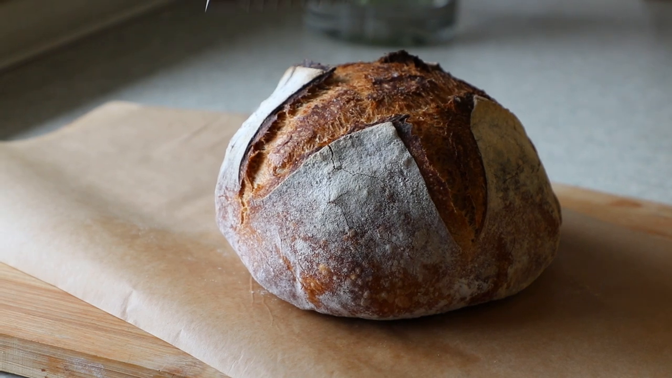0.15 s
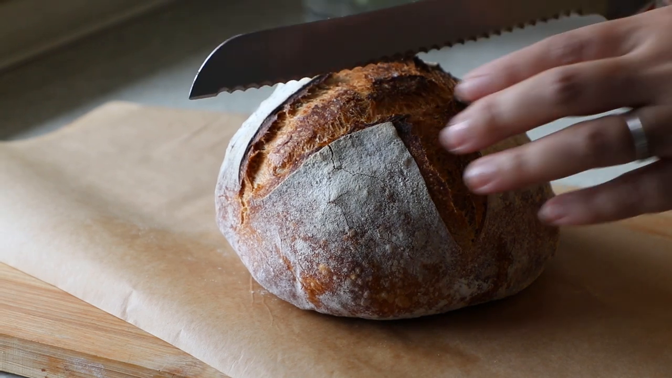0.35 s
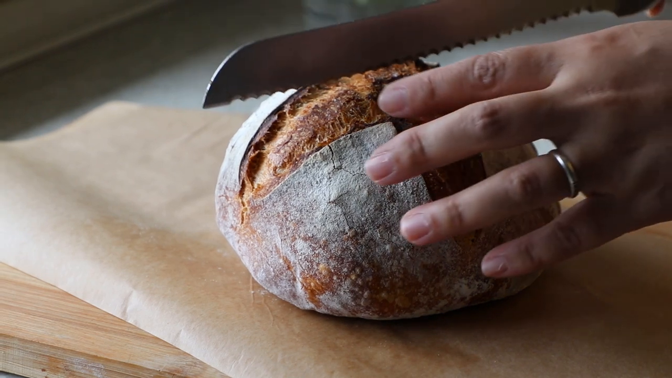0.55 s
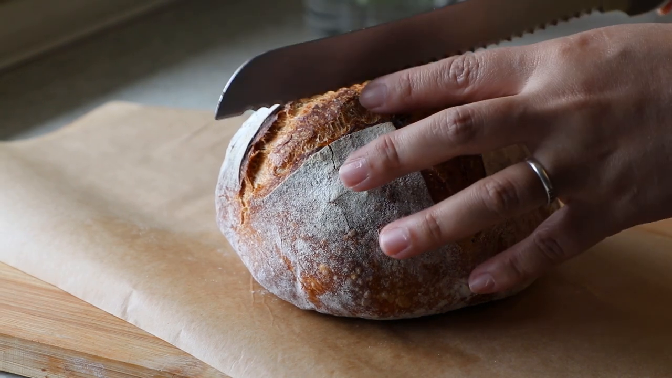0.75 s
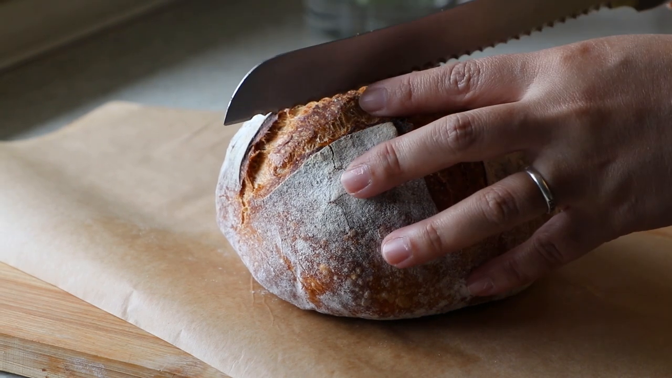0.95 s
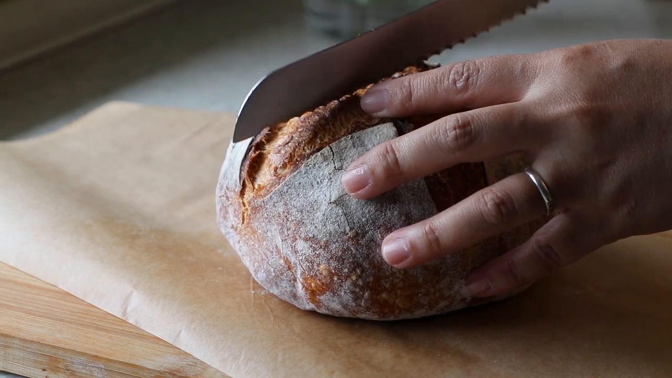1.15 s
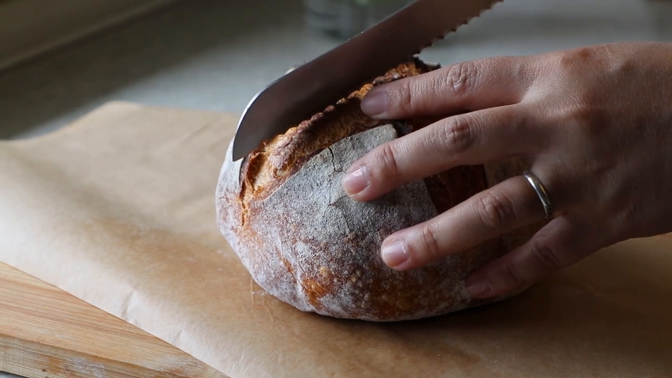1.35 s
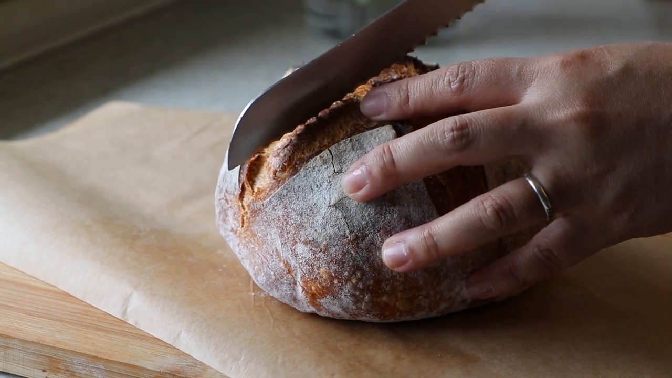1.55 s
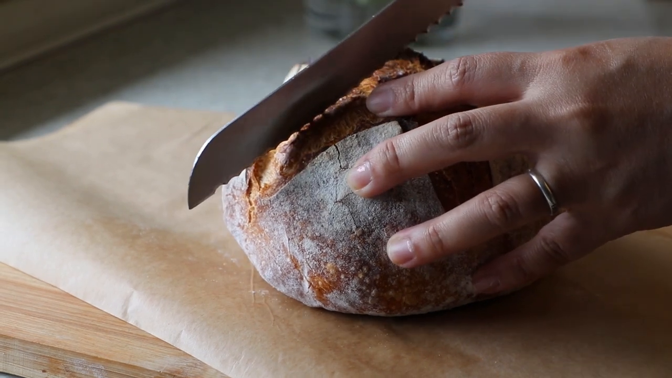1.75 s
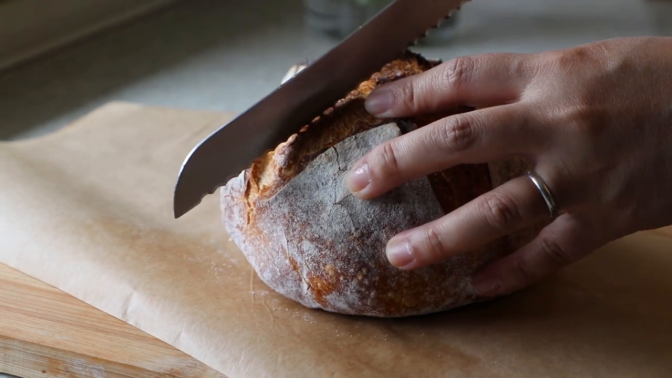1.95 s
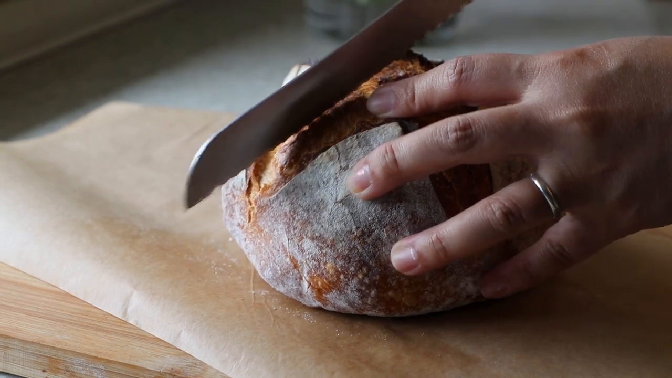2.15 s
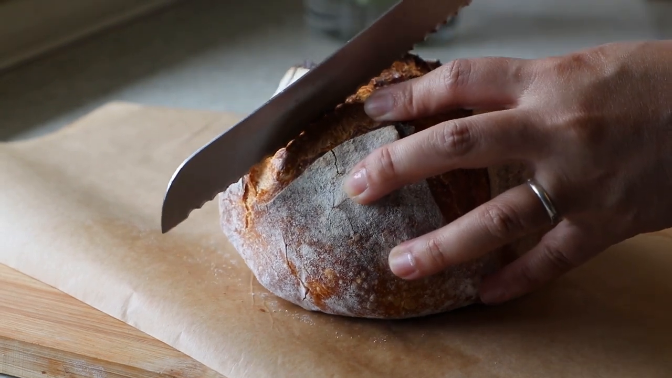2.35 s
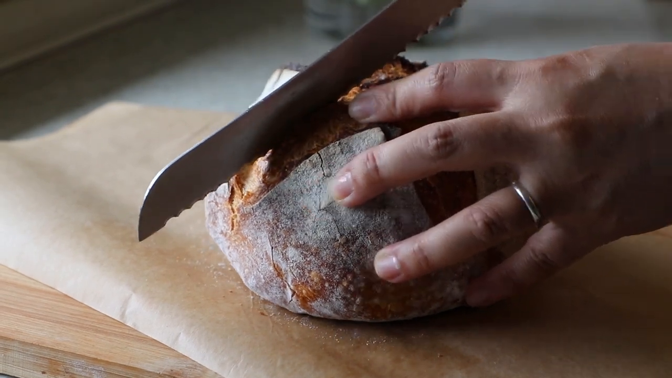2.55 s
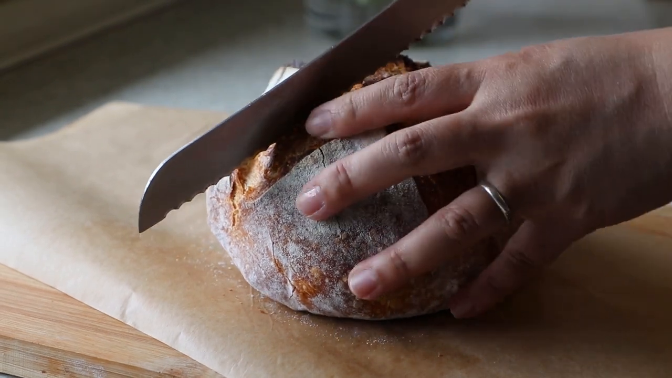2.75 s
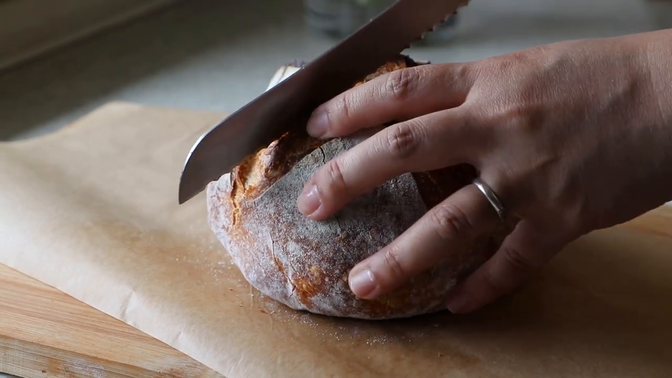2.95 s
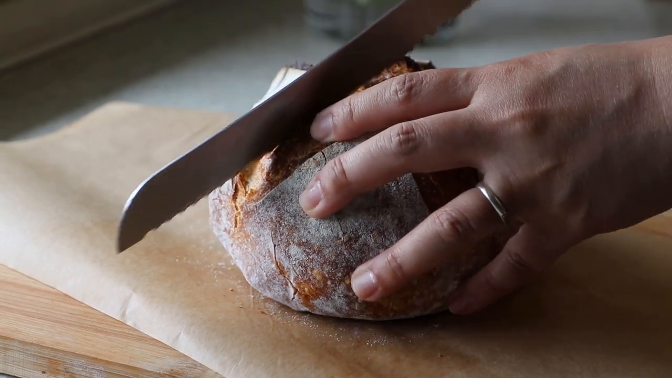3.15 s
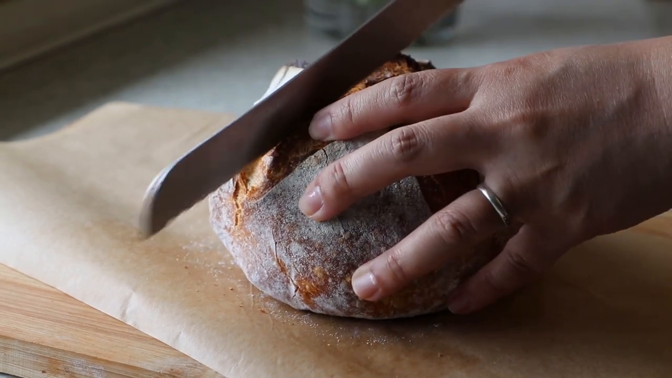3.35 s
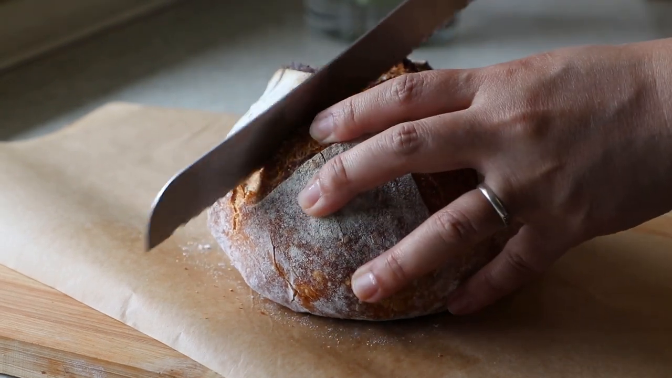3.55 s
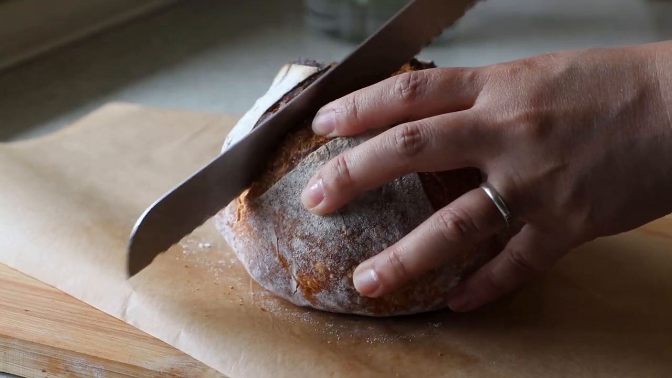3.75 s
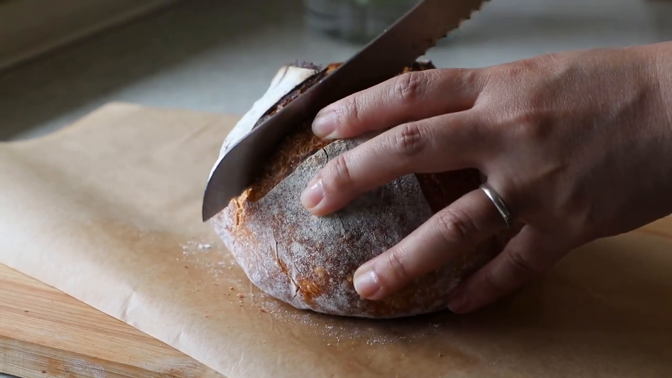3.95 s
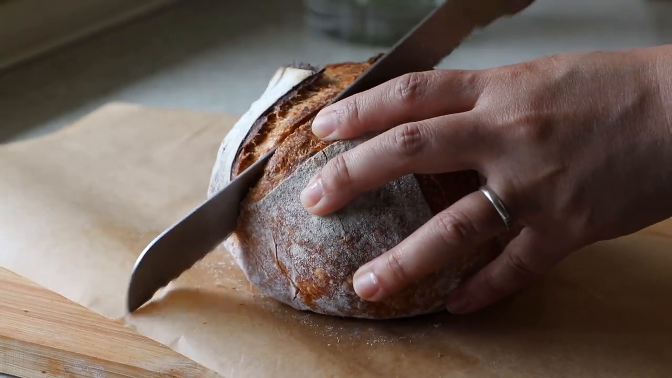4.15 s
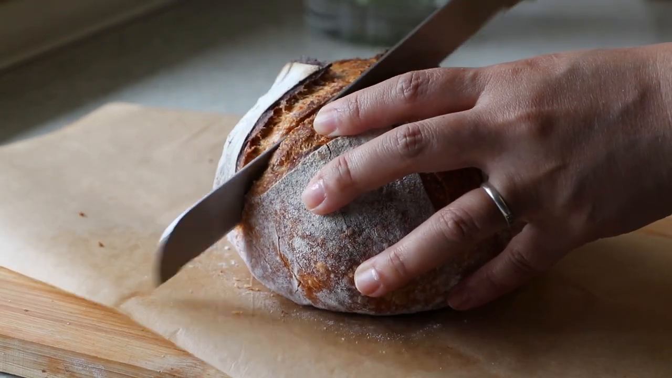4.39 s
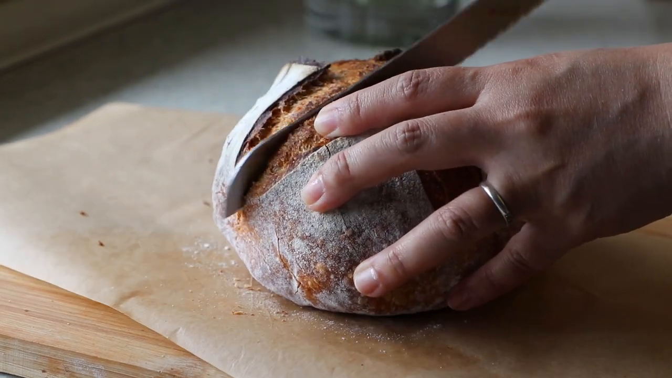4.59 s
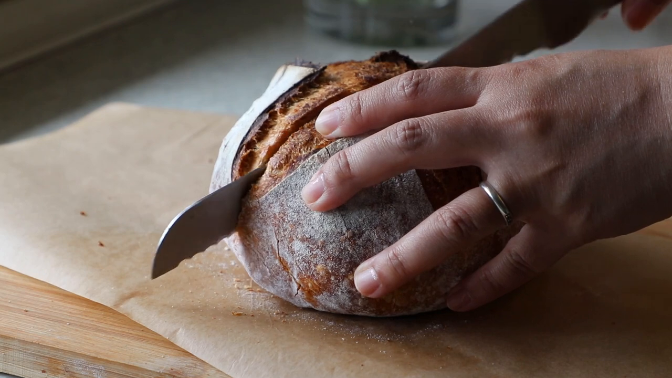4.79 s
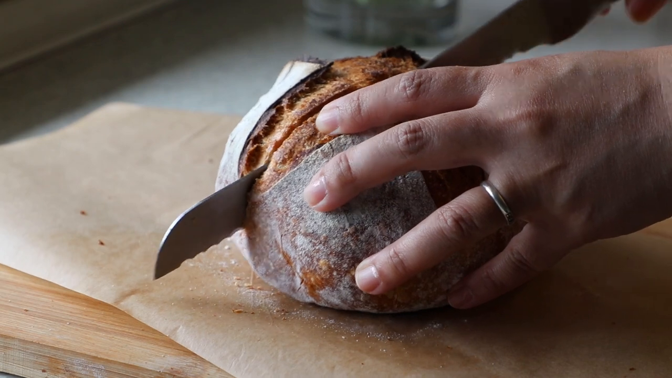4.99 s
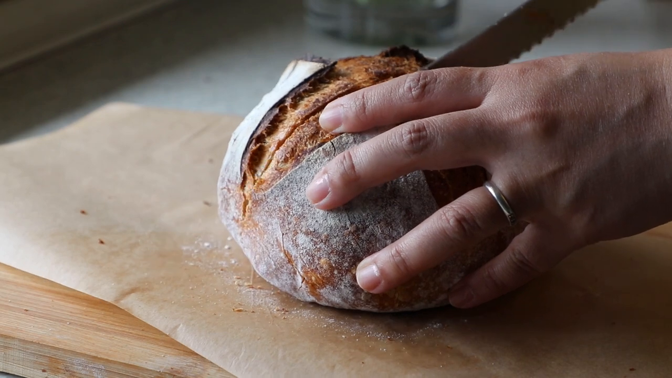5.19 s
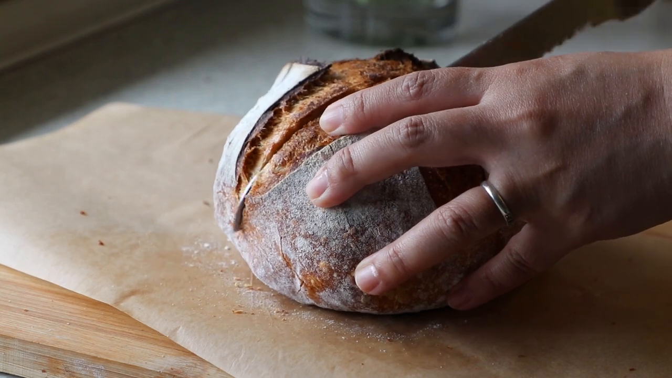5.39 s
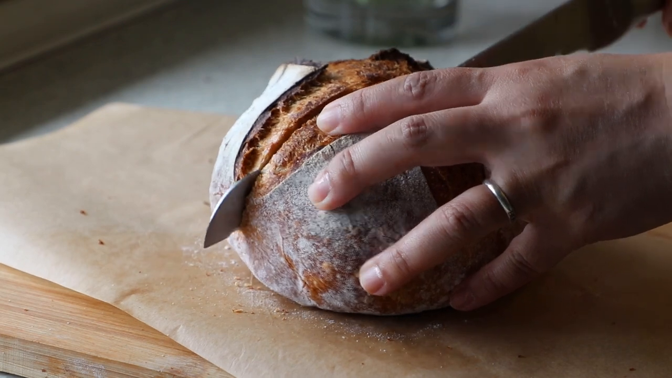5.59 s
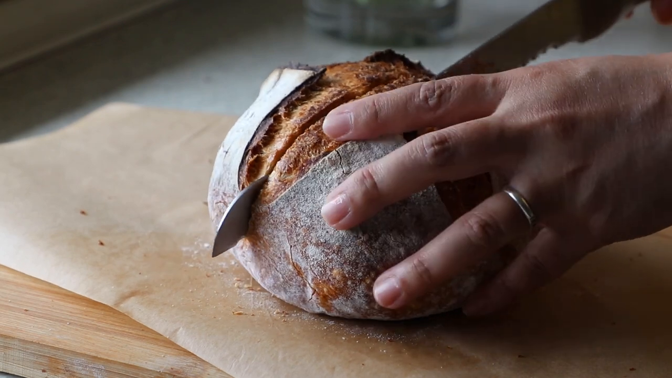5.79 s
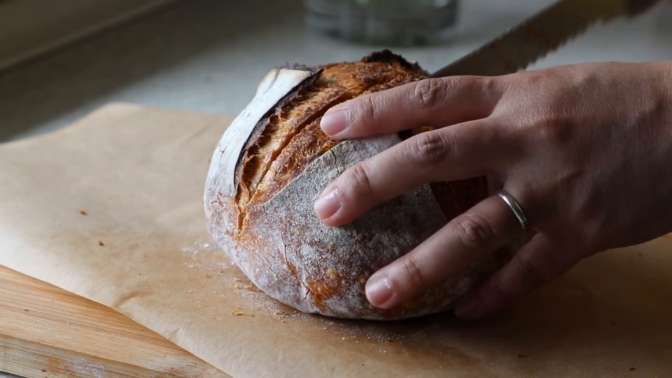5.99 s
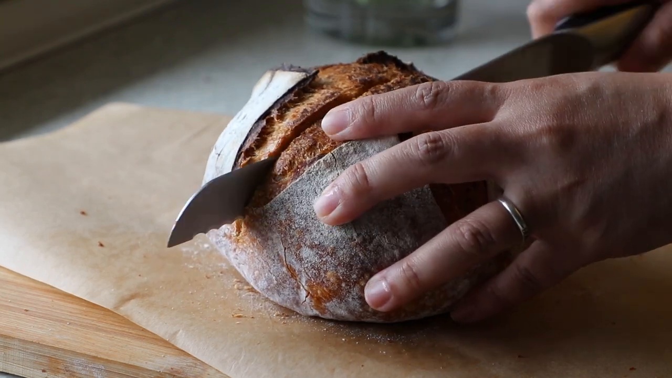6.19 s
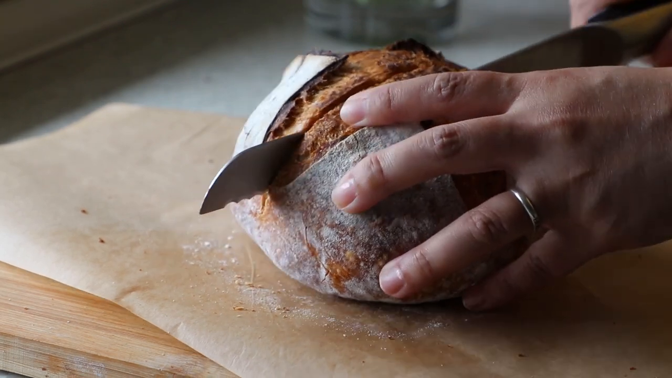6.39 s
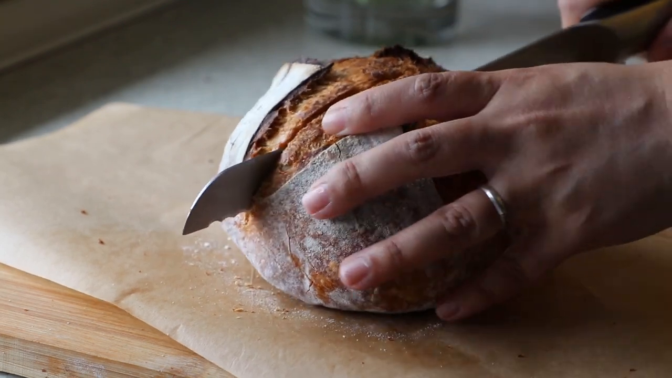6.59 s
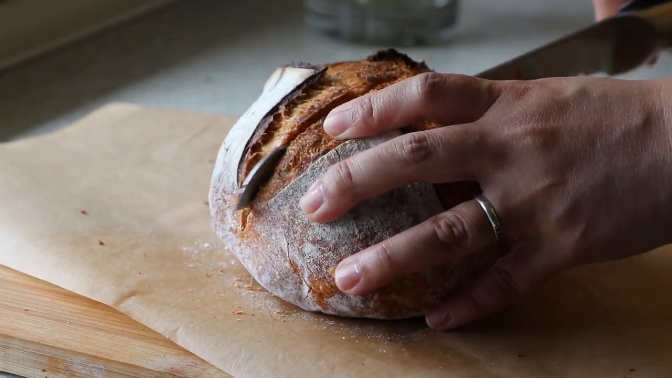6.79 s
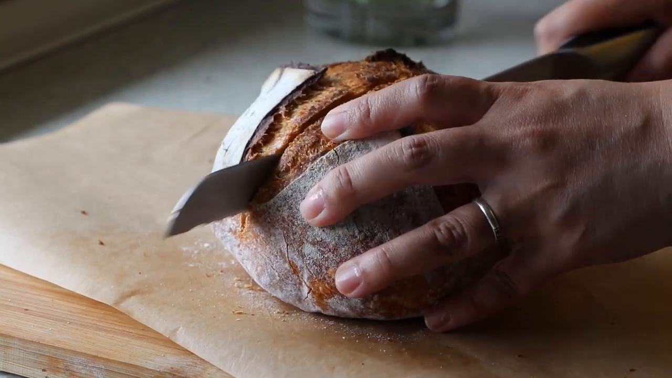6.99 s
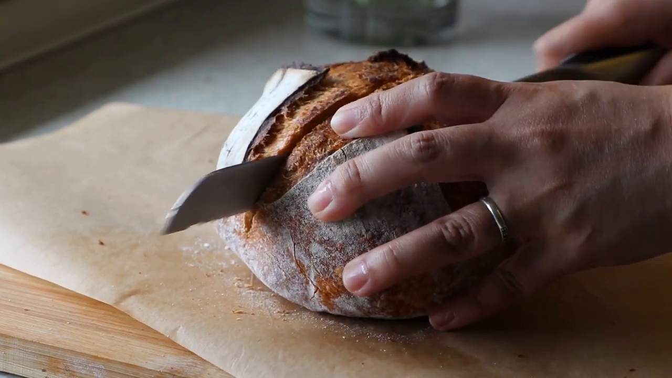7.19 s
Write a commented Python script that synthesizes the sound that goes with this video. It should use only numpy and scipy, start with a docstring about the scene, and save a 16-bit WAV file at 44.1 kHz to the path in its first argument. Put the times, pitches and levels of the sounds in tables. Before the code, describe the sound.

A quiet, small kitchen with soft, low steady room tone, heard by a close stereo microphone pair. A faint rustle comes at 0.03 s, a soft dull hand bump on the loaf at 0.84, and a thin, brief metallic zing at 1.03. From about 1.35 a serrated knife starts on the hard crust with light, choppy scratches, quickly becoming crisp crunches, with strong snaps near 1.7 and 2.4-2.5. After a short lull, sawing resumes at 2.9; fuller strokes around 3.1, 3.55, 4.05 and 4.65 grind and fizz with toothy flutter, alternating with lighter, darker return rasps. From 5 to 6 the strokes are shorter and patchier, with small pauses. Strong crunches at 6.05, 6.85 and 7.18 carry bright brittle cracks, with softer slides between. Slight low thuds of the loaf, a damped blade ring and short reflections accompany the cutting.

```python
"""Sawing a crusty loaf

A serrated knife saws through a crusty loaf on a wooden board in a small, quiet kitchen.
The teeth break thousands of tiny flakes, in clumps; now and then a larger piece of crust cracks.
Each fracture crunches, fizzes, rings the blade and pushes the loaf on its board.
A rustle, a hand on the loaf and a thin zing come first; a close microphone pair hears it all."""
import sys
import numpy as np
from scipy import signal
from scipy.fft import rfft, irfft
from scipy.io import wavfile
from scipy.ndimage import uniform_filter1d

SR = 44100
rng = np.random.default_rng(int(sys.argv[2]) if len(sys.argv) > 2 else 0)


def unload_audio(sound):
    """Save the sound as a 16-bit wav file, at the path given as the first command line argument."""
    columns = np.transpose(np.atleast_2d(sound))
    # keep every value between -1 and 1, then stretch to whole-number steps
    steps = np.round(np.clip(columns, -1, 1) * 32767)
    wavfile.write(sys.argv[1], SR, steps.astype(np.int16))


N = 319284

# Strokes on which the teeth bite. Each row: start in seconds, length in seconds, crunch in dB,
# swell from start to end in dB, fizz over crunch in dB, push on the loaf over crunch in dB.
BITES = [(1.369, 0.062, -49, -12.5, -2, -6), (1.543, 0.028, -52.5, -3, -5, 6),
         (1.673, 0.0875, -32, 2, 2.5, -4), (1.828, 0.057, -37, -21, -4, -7),
         (2.056, 0.046, -35, -2.5, 0, -5), (2.184, .055, -34, -10.5, 1.5, -2),
         (2.298, 0.053, -42.5, -12, 1.5, -9), (2.382, 0.02, -29.5, 0, 0, -4),
         (2.486, 0.019, -33.5, 1, 0, -10), (2.529, 0.076, -41.5, -11.5, 0, -11),
         (2.906, 0.1, -44.5, -8, -2, -20), (3.027, 0.036, -46, -15, 2, -7),
         (3.099, .125, -31.5, -1.5, 2.5, -6), (3.269, 0.021, -30.5, -1.5, 0.5, -3.5),
         (3.533, 0.17, -28.5, 0, 0.5, -8), (3.957, 0.1, -37, 8, 1.5, -15),
         (4.022, .26, -29, -3.5, 1.5, -10.5), (4.626, .27, -31, -2.5, 0, -15),
         (5.285, 0.11, -42, -7, 1.5, -13), (5.382, 0.11, -36, -1.5, 1, -18),
         (5.469, 0.042, -29.5, -5.5, 0, -8.5), (5.539, 0.046, -33.5, 2.5, -4, -10),
         (6.053, 0.2, -30.5, -3.5, -2, -12), (6.857, 0.11, -28, 1.5, -1, -8),
         (7.177, .06, -29.5, -6.5, 1, -13)]
# Light strokes, on which the teeth slide rather than bite. Each row: start in seconds, length in
# seconds, crunch in dB, swell in dB, fizz over crunch in dB, push on the loaf over crunch in dB.
SLIDES = [(2.868, 0.024, -52, 3, 3, -8), (3.36, 0.083, -38.5, 12, -1.5, -2),
          (3.785, 0.15, -44, -2.5, 2, -18), (4.355, 0.2, -40, -9.5, -1.5, -18),
          (4.975, 0.062, -46.5, 8.5, -4, -15), (5.052, 0.16, -37, -6, -3, -14),
          (5.68, 0.023, -41, 5, -2, -0.5), (5.72, 0.02, -49.5, -1, 9, -10), (5.89, 0.1, -39.5, 2.5, 0, -16),
          (6.315, 0.071, -37, 6, -0.5, -16), (6.505, 0.15, -49.5, 0.5, 1, -8),
          (6.71, 0.035, -33, 1.5, -1, -9.5), (7.045, 0.074, -34.5, 3, -1.5, -5)]


def sawing():
    """Biting and sliding strokes break flakes, which drive the crunch, the fizz and the push on the loaf."""
    biting = strokes(BITES, attack_s=0.02, release_db_per_s=404, flakes_per_s=7000) * teeth()
    # a sliding blade gives a finer, smoother grain
    rasp, fizz, push = strokes(SLIDES, attack_s=0.014, release_db_per_s=316, flakes_per_s=22000)
    return biting + np.array([sliding(rasp), fizz, push])


def strokes(table, attack_s, release_db_per_s, flakes_per_s, stir_db=-14, stir_db_per_s=326):
    """The blade stirs the crust, takes hold, swells or eases, and dies away as it slows to turn."""
    t = np.arange(0, N, 32) / SR  # a coarse clock is enough for the slow levels
    start, length, db, swell_db, fizz_db, push_db = np.transpose(table)[:, :, None]
    # before the stroke the crust stirs ever louder, up to stir_db against the stroke
    stir = amp(stir_db - stir_db_per_s * np.maximum(start - t, 0))
    grip = np.maximum(stir, np.clip((t - start) / attack_s, 0, 1))
    progress = np.clip((t - start) / length, 0, 1)
    slowing_s = np.maximum(t - start - length, 0)
    effort = grip * amp(db + swell_db * (progress - .5) - release_db_per_s * slowing_s)
    levels = []
    for over_db in (0, fizz_db, push_db):
        strongest = (effort * amp(over_db)).max(0)
        levels.append(np.interp(np.arange(N) / SR, t, strongest))
    crunch_db = 20 * np.log10(levels[0] + 1e-6)
    return np.array(levels) * flakes(crunch_db, flakes_per_s)


def flakes(level_db, per_s, full_db=-28, thinning=.28, spread_db=2.0, largest=6.1,
           clumps_per_s=65, clump_s=0.0025, clump=1.1):
    """Tiny fractures at an even level: fewer under a light blade, and stronger in random clumps."""
    size = amp(spread_db * np.minimum(rng.exponential(1, N), largest)) * rng.choice([-1, 1], N)
    # per_s is the rate at full_db
    chance = per_s * amp(thinning * (level_db - full_db)) / SR
    clicks = size * (rng.random(N) < chance)
    # each clump starts with a sudden grip that fades over clump_s
    starts = np.cumsum(rng.gamma(2, SR / clumps_per_s / 2, N // 100)).astype(int)
    starts = starts[starts < N]
    grip = np.bincount(starts, rng.rayleigh(1, N)[starts], N)
    fading_grip = signal.lfilter([1], [1, -np.exp(-1 / (clump_s * SR))], grip)
    train = clicks * (1 + clump * fading_grip)
    return train / np.sqrt(uniform_filter1d(train ** 2, size=1500) + 1e-9)


def teeth(per_s=37, jitter=.2, spread_db=1.25, fall_db=8, count=600):
    """Each serration catches hard, then its level falls until the next catch as the crust gives way."""
    spacing, strength = rng.standard_normal((count, 2)).T
    catches = np.cumsum(np.exp(jitter * spacing)) / per_s
    passed = np.interp(np.arange(N) / SR, catches, np.arange(count))
    gain = amp(spread_db * strength[passed.astype(int)] - fall_db * (passed % 1))
    return gain / np.sqrt(np.mean(gain ** 2))


def sliding(x, dull_hz=3000, rub_db=4.0):
    """A sliding tooth pushes softly, so its rasp is darker."""
    return amp(rub_db) * signal.lfilter(*signal.butter(1, dull_hz, fs=SR), x)


# The larger cracks of the crust. Each row: start in seconds, length in seconds,
# crunch in dB as if spread over 10 ms (before the level below), fizz over crunch in dB.
CRACKS = [(1.341, 0.0044, -53, -1), (1.381, 0.0054, -35.5, 2), (1.543, 0.0063, -33.5, 1.5),
          (1.555, 0.0076, -38, 3), (1.675, 0.0013, -29.5, 4.5), (1.689, 0.0097, -24.5, 1.5),
          (1.845, 0.0037, -26.5, 5.5), (1.954, 0.0023, -39.5, -6), (1.975, 0.0058, -39, 2),
          (2.057, 0.0056, -37, 6), (2.19, 0.0042, -35, -1), (2.217, 0.0053, -26.5, 0.5),
          (2.383, 0.0017, -37, 10), (2.388, 0.0093, -21, -0.5), (2.465, 0.0036, -31.5, 2),
          (2.478, .013, -21, 1), (2.912, 0.0036, -35.5, 6.5), (3.186, .004, -30.5, 2),
          (3.211, 0.0072, -29, 0), (3.514, 0.0045, -29.5, 2), (3.537, 0.0026, -26, 1),
          (3.694, .002, -26, -4), (3.957, 0.0045, -37.5, 2), (4.221, 0.0036, -24.5, -5),
          (4.233, 0.0091, -27, 10.5), (4.365, 0.0055, -30, -2.5), (4.624, .005, -29.5, -5),
          (4.662, 0.0052, -23.5, 2), (4.826, .006, -27, 4.5), (4.863, 0.0026, -27.5, 2),
          (4.874, 0.00084, -25, -10), (4.982, 0.0035, -40, 2.5), (5.006, 0.0033, -35.5, 4.5),
          (5.039, .002, -43, 10.5), (5.282, 0.0043, -38, 3.5), (5.471, 0.0028, -27.5, -3.5),
          (5.565, 0.0062, -33.5, 10.5), (5.874, 0.0038, -39.5, 4), (6.047, 0.0029, -34, 1),
          (6.208, .005, -37, 11), (6.225, .007, -23.5, 1), (6.319, 0.0032, -36, -3),
          (6.53, 0.0054, -44, -3), (6.836, 0.0054, -27, 0.5), (6.856, 0.0028, -23.5, 0),
          (6.935, 0.005, -24, 4), (7.19, 0.0067, -25.5, 4.5)]


def cracks(level_db=-0.1, steps_per_s=4500, spread_db=9, snap_db=11, snap_share=0.49,
           push_db=-11, deep_push_db=-11, count=128):
    """A crack runs through the crust in quick uneven steps, with one main snap part of the way through."""
    drives = np.zeros((3, N))
    for start, length, crunch_db, fizz_db in CRACKS + chips():
        when, size, sign = rng.random((count, 3))[:int(length * steps_per_s)].T
        small_steps = amp(spread_db * size) * np.sign(sign - .5)
        steps = unit(np.r_[amp(snap_db), small_steps]) * np.sqrt(SR) / 10  # the energy of 10 ms at level 1
        at = np.minimum((start + np.r_[snap_share, when] * length) * SR, N - 1).astype(int)
        # a whole shell passes on the push best: it weakens as the cut deepens
        push_over_db = push_db + deep_push_db * cut_depth(start)
        for drive, over_db in zip(drives, (0, fizz_db, push_over_db)):
            np.add.at(drive, at, amp(crunch_db + over_db) * steps)
    return amp(level_db) * drives


def chips(per_s=10, length_s=0.0016, level_db=-2, spread_db=1, count=12):
    """Small chips break off at random places along the biting strokes, as rows like those of CRACKS."""
    rows = []
    for start, length, db, swell_db, fizz_db, _ in BITES:
        for place, size in rng.random((count, 2))[:int(per_s * length)]:
            stroke_db = db + swell_db * (place - .5)
            chip_db = stroke_db + level_db + spread_db * (2 * size - 1)
            rows.append((start + place * length, length_s, chip_db, fizz_db))
    return rows


def bread(drives, low_cut_hz=440, loaf_db=2.0):
    """Fractures sound directly from the crust and through the blade, the shell and the loaf."""
    crunch, fizz, push = drives
    depth = cut_depth(np.arange(N) / SR)
    bright = crust(crunch, fizz) + blade(crunch, depth) + shell(crunch, push, depth)
    return above(bright, low_cut_hz) + amp(loaf_db) * loaf(push)


# How far the cut has gone into the loaf. Each row: time in seconds, depth from 0 to 1.
DEPTH = [(2.5, 0.25), (5, 1)]


def cut_depth(seconds):
    """The cut deepens steadily between the rows, and holds still before and after them."""
    return np.interp(seconds, *np.transpose(DEPTH))


# The colour of crunching crust. Each row: frequency in Hz, level in dB.
CRUNCH = [(420, -21), (850, -10), (1450, -3), (2300, -2), (3500, -1), (5700, 0), (8000, 1), (12000, -19.5)]
# The colour of fizzing crust. Each row: frequency in Hz, level in dB.
FIZZ = [(2000, 6.5), (6000, -4.5), (7600, 16.5), (9200, 13), (12200, 16), (15800, 11.5)]


def crust(crunch, fizz):
    """Every fracture is a short click, with a crunching and a fizzing part."""
    return wander(through(crunch, colour(CRUNCH)) + through(fizz, colour(FIZZ)))


def wander(x, patchy_db=1.0, patch_hz=1100, patch_s=0.024):
    """Each piece of crust has its own size and hardness, so the colour shifts as the teeth move on."""
    z = signal.stft(x, SR, nperseg=256)[2]
    field = rng.standard_normal(z.shape)
    for _ in range(2):  # smooth the random field over frequency, then over time
        field = uniform_filter1d(field, max(1, int(patch_hz * 256 / SR)), axis=-2)
        field = uniform_filter1d(field, max(1, int(patch_s * SR / 128)), axis=-1)
    return signal.istft(z * amp(patchy_db * field / field.std()), SR, nperseg=256)[1][:, :N]


# The blade, damped by the bread. Each row: frequency in Hz, width in Hz, level in dB.
BLADE = [(914, 33, -7), (992, 41, 2.5), (1273, 84, -3.5), (1685, 82, 0), (2336, 360, -2), (2640, 8.9, -13),
         (2823, 26, -4)]


def blade(crunch, depth, level_db=-14, buried_db=6):
    """Fractures ring the blade, and more strongly as a deeper cut grips it."""
    return amp(level_db + buried_db * depth) * through(crunch, ring(BLADE))


# The hard shell of crust. Each row: frequency in Hz, width in Hz, level in dB.
SHELL = [(483, 11, -2.5), (540, 72, -5.5), (618, 20, -5), (680, 24, 5), (752, 34, -2)]


def shell(crunch, push, depth, opened_db=-5):
    """The shell flexes when it is both broken and pressed; a deeper cut slackens it."""
    bending = np.sign(crunch) * np.sqrt(abs(crunch * push))
    return amp(opened_db * depth) * through(bending, ring(SHELL))


# The soft loaf bouncing on its board. Each row: frequency in Hz, width in Hz, level in dB.
LOAF = [(102, 6.6, 3.5), (189, 29, -1), (206.2, 6.1, -2), (303, 400, -6)]


def loaf(push, low_cut_hz=72, high_cut_hz=290):
    """The loaf rocks on the board; its soft crumb soaks up all but the low thud."""
    crumb = signal.butter(4, high_cut_hz, fs=SR, output="sos")
    return above(signal.sosfilt(crumb, through(push, ring(LOAF))), low_cut_hz)


# The blade ringing freely. Each row: frequency in Hz, width in Hz, level in dB.
STEEL = [(3230, 12, -3.5), (5540, 130, -8), (6970, 140, -4), (12100, 45, -4), (13920, 75, 2)]


def first_touch(start_s=1.026, length_s=0.0097, ring_db=-35, scratch_db=-37, crust_db=-43):
    """One tooth skids on the crust, and the free blade answers with a thin zing."""
    skid = rub(start_s, length_s)
    zing = amp(ring_db) * through(skid, ring(STEEL))
    scratch = amp(scratch_db) * through(skid, colour(FIZZ))
    crunch = amp(crust_db) * through(skid, colour(CRUNCH))
    return zing + scratch + crunch


def hand(start_s=.838, length_s=0.028, level_db=-46.5):
    """The fingers settle on the loaf with a soft bump."""
    return amp(level_db) * loaf(rub(start_s, length_s))


def rustle(start_s=0.027, length_s=0.05, level_db=-50):
    """A faint, soft rustle before the knife comes down."""
    return amp(level_db) * sliding(through(rub(start_s, length_s), colour(CRUNCH)))


def rub(start_s, length_s):
    """A brief sliding contact: noise that swells to level 1 and fades."""
    t = np.arange(N) / SR
    place = 2 * (t - start_s) / length_s - 1  # -1 at the start, 1 at the end
    return rng.standard_normal(N) * np.sqrt(np.maximum(1 - place ** 2, 0))


# The colour of the kitchen's echo. Each row: frequency in Hz, level in dB.
ROOM = [(150, -9), (700, -13), (2000, -7), (14000, -9.5)]
# How long the echo lasts. Each row: frequency in Hz, time to fall by 60 dB in seconds.
ROOM_T60 = [(200, 0.088), (3000, 0.31), (14000, 0.34)]


def kitchen(near_db=-5.5, near_s=0.0046, size=16384):
    """Echo of one click: quick reflections from the board and the hand, then the walls."""
    t = np.arange(size) / SR
    hz, frame_s, z = signal.stft(diffuse(size, ROOM), SR, nperseg=256)
    t60 = read(ROOM_T60, hz)[:, None]
    # the square root keeps a long echo from carrying more energy than a short one
    dying = amp(-60 * frame_s / t60) * np.sqrt(2 * np.log(1000) / (t60 * SR))
    walls = signal.istft(z * dying, SR, nperseg=256)[1][:, :size] * (1 - np.exp(-t / near_s))
    near = unit(diffuse(size, ROOM) * np.sqrt(t) * np.exp(-t / near_s))
    return amp(near_db) * near + walls


# The steady background of the kitchen. Each row: frequency in Hz, level in dB.
FLOOR = [(25, -10), (55, -8), (95, 10.5), (200, -1), (720, 1.5), (1300, -5), (2300, -4.5), (3600, -8),
         (6000, -9), (9000, -16), (12500, -11)]


def background(level_db=-55.5):
    """A steady, quiet noise that reaches the microphones from all sides."""
    return amp(level_db) * np.sqrt(N) * unit(diffuse(N, FLOOR))


def diffuse(size, points, alike_hz=1700, most_alike=0.63):
    """Coloured noise from all sides: the two microphones agree, in part, only on long waves."""
    hz = np.fft.rfftfreq(size, 1 / SR)
    alike = most_alike / (1 + (hz / alike_hz) ** 4)
    mid, side = rfft(rng.standard_normal((2, size))) * np.sqrt([1 + alike, 1 - alike])
    return irfft(np.array([mid + side, mid - side]) * amp(read(points, hz)), size)


def amp(db):
    """Decibels to gain."""
    return 10 ** (np.asarray(db) / 20)


def unit(x):
    """Scales a response to energy 1 per channel, on average."""
    return x / np.sqrt(np.mean(np.sum(x ** 2, -1)) + 1e-20)


def read(points, hz):
    """Joins table rows by straight lines on a log-frequency axis."""
    f, value = np.transpose(points)
    return np.interp(np.log(hz + 1), np.log(f), value)


def colour(points, size=1024):
    """The sharpest click that has the given spectrum and makes no sound before it starts."""
    log_gain = np.log(amp(read(points, abs(np.fft.fftfreq(size, 1 / SR)))))
    return unit(np.fft.ifft(np.exp(np.conj(signal.hilbert(log_gain)))).real)


def ring(modes, size=8192):
    """Response of a body to one click: a sum of dying tones; a wider mode dies sooner."""
    t = np.arange(size) / SR
    total = np.zeros(size)
    for hz, width, db in modes:
        decay = np.exp(-np.pi * width * t)
        total += amp(db) * width * decay * np.cos(2 * np.pi * hz * t)
    return unit(total)


def through(x, response):
    """Every click in x sets off the response, channel by channel (convolution)."""
    return signal.oaconvolve(np.atleast_2d(x), np.atleast_2d(response), axes=1)[:, :N]


def above(x, hz):
    """A small body cannot radiate deep sound: a steep high-pass."""
    return signal.sosfilt(signal.butter(4, hz, "high", fs=SR, output="sos"), x)


def scene(direct_db=-4, echo_db=-2.0, swing_hz=3.1, count=3):
    """The cutting point travels to and fro, so its reflections keep changing."""
    dry = bread(sawing() + cracks()) + first_touch() + hand() + rustle()
    turn = 2 * np.pi * swing_hz * np.arange(N) / SR
    echoes = 0
    for k in range(count):  # several echo patterns take turns
        echoes = echoes + through(dry * np.cos(turn + np.pi * k / count), kitchen())
    return amp(direct_db) * dry + amp(echo_db) * echoes + background()


# Level balance of the microphone pair. Each row: frequency in Hz, left over right in dB.
LEAN = [(500, -0.1), (1500, 1.1), (3500, -1.5), (10000, -0.5), (13000, -3.5)]
# Phase of the microphone pair. Each row: frequency in Hz, lead of the left side in radians.
LEAD = [(7000, -0.3), (7700, -1.53), (12000, -1.62), (15500, 1)]


def record(dry, edge_hz=16000):
    """The two microphones differ in level and, mostly in the treble, in phase; then the band limit."""
    hz = np.fft.rfftfreq(N, 1 / SR)
    half = np.array([[.5], [-.5]])  # each side takes half of the difference
    gain = amp(half * read(LEAN, hz))
    phase = np.exp(1j * half * read(LEAD, hz))
    pair = irfft(rfft(dry) * gain * phase, N)
    low_pass = signal.firwin(401, edge_hz, window=("kaiser", 8), fs=SR)
    return signal.oaconvolve(pair, low_pass[None], "same", axes=1)


dry = scene()
out = record(dry)
unload_audio(out)
```